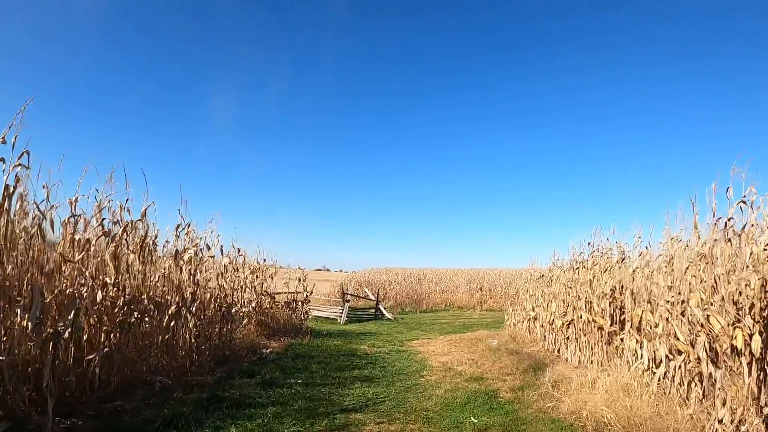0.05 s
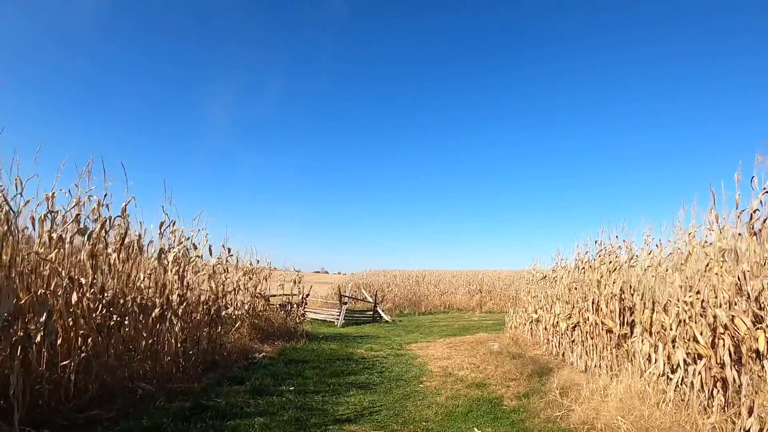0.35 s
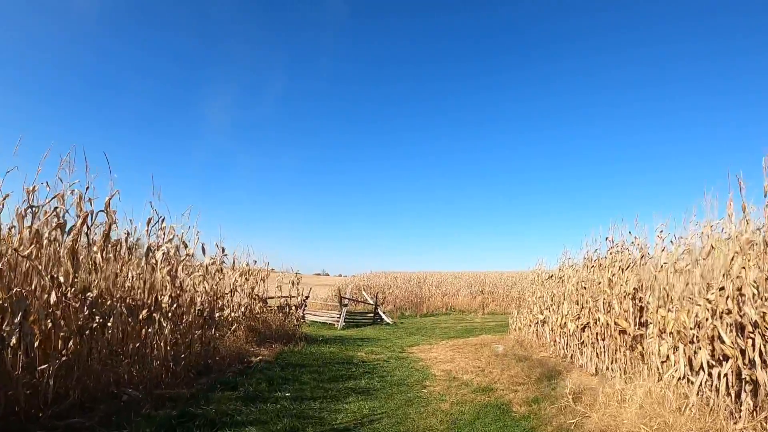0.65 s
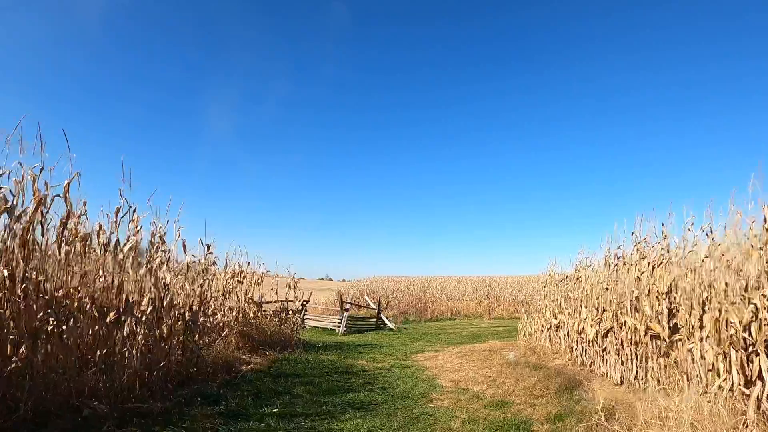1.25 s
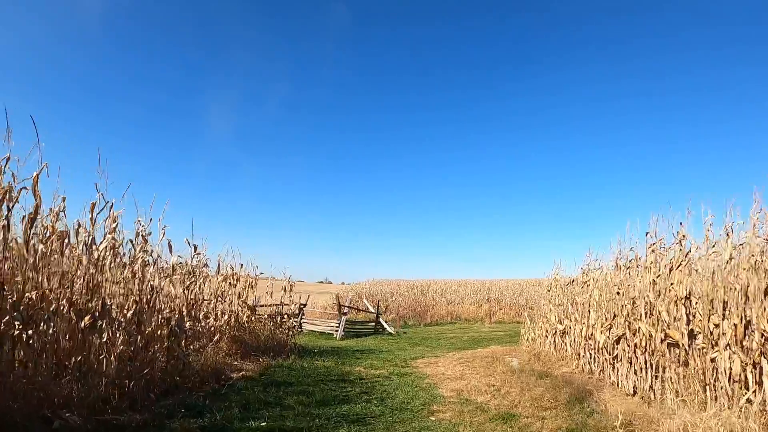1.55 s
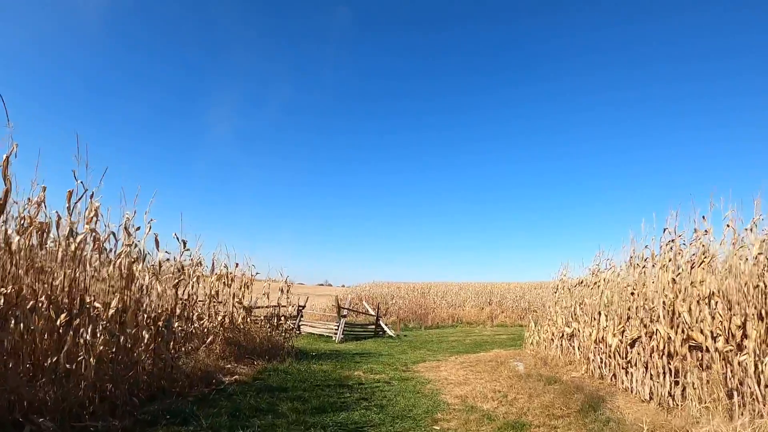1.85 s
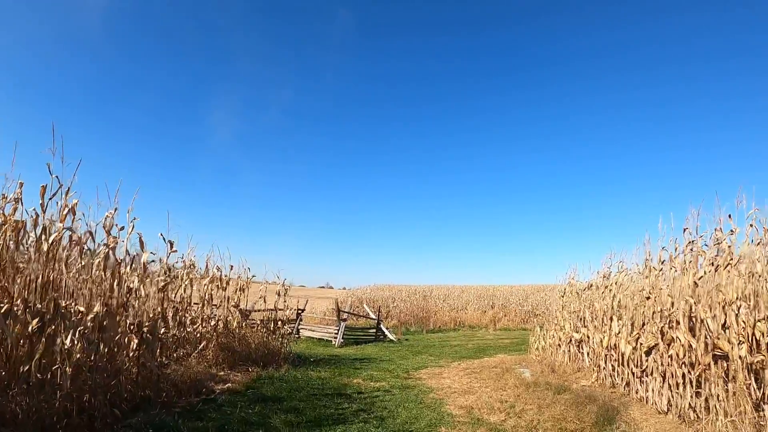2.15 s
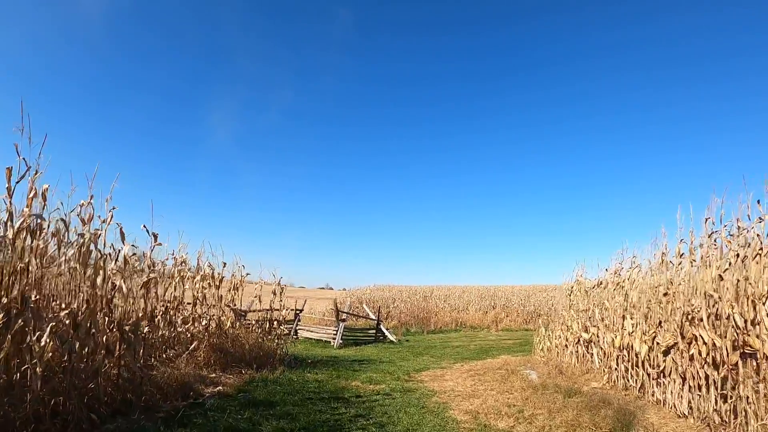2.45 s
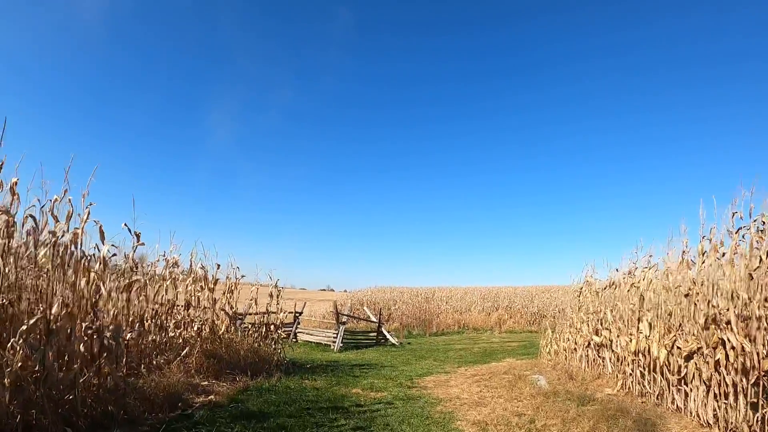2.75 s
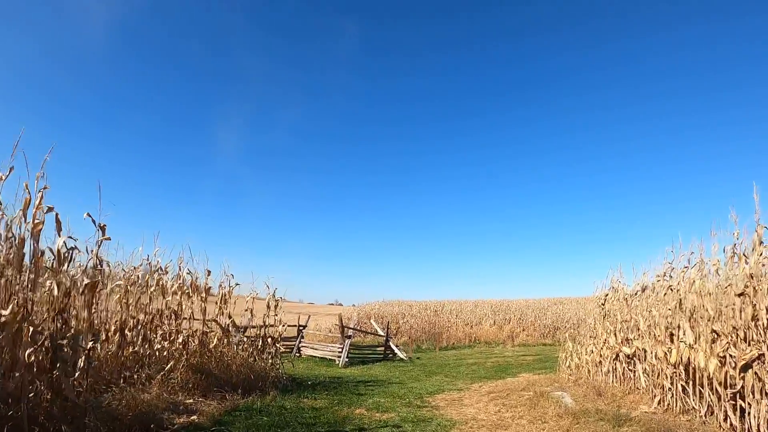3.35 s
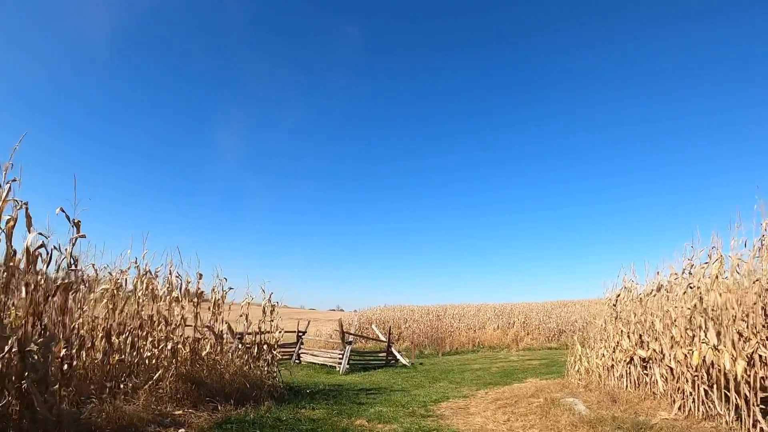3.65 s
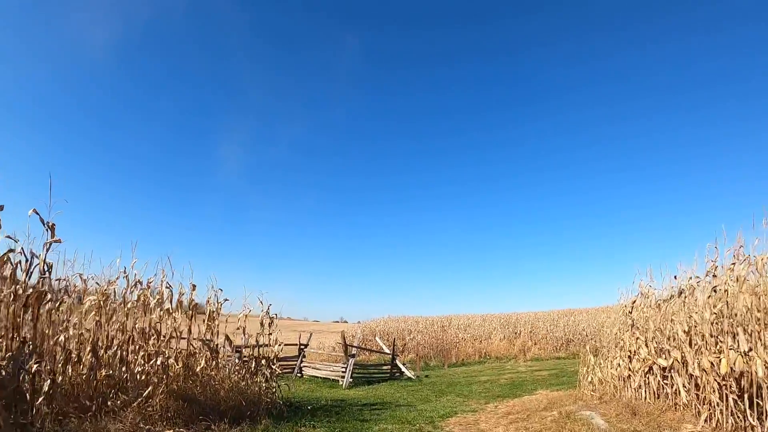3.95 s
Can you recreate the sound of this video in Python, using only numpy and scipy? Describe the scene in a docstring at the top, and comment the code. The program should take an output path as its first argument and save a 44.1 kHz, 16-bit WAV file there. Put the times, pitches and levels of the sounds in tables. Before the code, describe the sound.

Dry corn rustles in the wind outdoors. Leaves swish and stalks tick close on the left over a low microphone rumble and very faint insects. Near the end, a gust buffets the microphone with dull thumps.

```python
"""Dry corn hisses in the wind, over a low rumble of air on the microphone.
In the nearest row, on the left, leaves brush and scrape in runs of tiny slips and hollow stalks
tick as they knock together. Further off, insects trill and rasp faintly in the grass.
Near the end a gust buffets the microphone and single eddies thump against it."""
import sys
import numpy as np
from scipy import signal
from scipy.fft import rfft, irfft
from scipy.io import wavfile

SR = 44100
rng = np.random.default_rng(int(sys.argv[2]) if len(sys.argv) > 2 else 0)


def log_audio(samples):
    """Write samples as a 16-bit WAV file to the path given in sys.argv[1]."""
    # one column per channel
    frames = np.atleast_2d(samples).T
    # limit to full scale, then quantise
    limited = np.clip(frames, -1, 1)
    pcm = np.round(limited * 32767).astype(np.int16)
    wavfile.write(sys.argv[1], SR, pcm)


N = 176400
TIME = np.arange(N) / SR
HZ = np.maximum(np.arange(N // 2 + 1) * SR / N, 1)
NEAR_ROW_LEFT_DB, LEAF_FLUTTERS_PER_S = 9.5, 36


def from_db(db):
    """Decibels to gain."""
    return 10 ** (np.asarray(db) / 20)


def unit_rms(x):
    """Scale to unit power."""
    return x / np.sqrt(np.mean(x ** 2) + 1e-20)


def in_time(rows):
    """A control curve at every sample."""
    return np.interp(TIME, *np.transpose(rows))


def at_hz(points):
    """A spectrum table at every frequency."""
    hz, value = np.transpose(points)
    return np.interp(np.log(HZ), np.log(hz), value)


def band(x, low_hz, high_hz):
    """A causal band-pass."""
    return signal.sosfilt(signal.butter(2, [low_hz, high_hz], "band", fs=SR, output="sos"), x)


def swell(centre_s, length_s):
    """A smooth rise and fall around a moment."""
    return np.exp(-(2 * (TIME - centre_s) / length_s) ** 2)


def drift(per_s):
    """A smooth random wander of spread 1."""
    step, settle = 40, 2000  # samples per point, points discarded
    pole = np.exp(-2 * np.pi * per_s * step / SR)
    noise = rng.standard_normal(N // step + settle + 2)
    slow = signal.lfilter([1], [1, -2 * pole, pole * pole], noise)[settle:]
    return np.interp(np.arange(N) / step, np.arange(len(slow)), unit_rms(slow))


def pan(left_db):
    """Left and right gains for a level difference."""
    return unit_rms(from_db([[left_db / 2], [-left_db / 2]]))


def grains(per_s, spread_db, size=N):
    """Two streams of random clicks; with more spread, a few stand out."""
    sizes = from_db(spread_db * np.minimum(rng.exponential(1, (2, size)), 5))
    signs = rng.choice([-1, 1], (2, size))
    return unit_rms(sizes * signs * (rng.random((2, size)) < per_s / SR))


def friction(slips_per_s, spread_db, smooth, size=N):
    """Dry leaf on dry leaf: tiny slips within a hiss that holds the smooth share of the power."""
    slips = grains(slips_per_s, spread_db, size)
    return np.sqrt(1 - smooth) * slips + np.sqrt(smooth) * rng.standard_normal((2, size))


# balance of the microphone's two ports: (frequency [Hz], left over right [dB])
PORT_BALANCE = [(30, 1.8), (50, 6.5), (80, 4.2), (140, 1.1), (260, 1), (500, 2.9), (1200, 6), (2300, 7.5),
                (3500, 9.3), (5000, 1.8), (8000, 1.3), (12000, 3.7)]
# how alike the ports sound: (frequency [Hz], coherence [0-1])
PORT_COHERENCE = [(30, .55), (70, .45), (140, .85), (260, .93), (500, .73), (2000, .7), (4000, .5),
                  (8000, .33), (13000, .42)]
# phase between the ports: (frequency [Hz], left lead [rad])
PORT_LEAD = [(30, -3), (65, -1.8), (130, -1.5), (260, -1.5), (600, -.5), (1500, -.7), (2800, -1.1),
             (4600, .9), (6600, 1.3), (9000, 1.9), (13000, 2.6)]
def at_ports(pair, colour):
    """Colour two unrelated signals and blend them into the left and right ports."""
    shared, other = rfft(pair)
    alike, lean = np.clip(at_hz(PORT_COHERENCE), 0, 1), from_db(at_hz(PORT_BALANCE))
    right = alike * np.exp(-1j * at_hz(PORT_LEAD)) * shared + np.sqrt(1 - alike ** 2) * other
    ports = np.array([lean * shared, right]) * np.sqrt(2 / (1 + lean ** 2))
    return irfft(ports * unit_rms(from_db(at_hz(colour))), N)


def trill(first_s, per_s, hz, half_width_hz, jitter_s=.003, purity=.35):
    """Slightly uneven wing strokes sound a wavering tone; the corn scatters part of it."""
    strokes = np.cos(np.pi * per_s * (TIME - first_s + jitter_s * drift(7.1))) ** 4
    scattered = unit_rms(band(rng.standard_normal((2, N)), hz - half_width_hz, hz + half_width_hz))
    phase = 2 * np.pi * np.cumsum(hz + half_width_hz / 4 * drift(27.3)) / SR
    tone = unit_rms(np.sin([phase, phase + np.pi / 2]))
    uneven = from_db(2 * drift(30))
    return unit_rms(strokes * uneven * (np.sqrt(purity) * tone + np.sqrt(1 - purity) * scattered))


# insects off in the grass: (first pulse [s], pulse rate [1/s], pitch [Hz], half width [Hz],
# level before the swell [dB], left over right [dB])
TRILLERS = [(.038, 17.02, 7885, 130, -72, -2), (.01, 17.7, 8400, 130, -78, 1),
            (.03, 17.3, 7420, 260, -80, -2)]
# the trills swell and fade together: (time [s], gain [dB])
CHORUS_SWELL = [(0, -1.5), (1.1, -.5), (1.4, -3), (1.67, 3), (1.83, -5), (2.02, -4), (2.16, 3), (2.7, 0),
                (3.28, 3), (3.45, -3.5), (4, -2)]
# short strokes of a slower insect: (time [s], level [dB])
RASP_STROKES = [(.155, -72), (.375, -70), (.82, -70), (1.06, -68), (1.31, -70), (2.24, -67.5), (2.47, -65),
                (2.74, -66.5), (2.79, -69), (2.95, -71), (3.19, -71)]
def insects(teeth_per_s=120):
    """Three fast trills and one slow, toothed rasp, faint at the microphone."""
    trills = sum(from_db(db) * pan(left_db) * trill(s, per_s, hz, half_width)
                 for s, per_s, hz, half_width, db, left_db in TRILLERS)
    teeth = np.sin(np.pi * teeth_per_s * TIME) ** 2
    rasp = unit_rms(teeth * band(rng.standard_normal((2, N)), low_hz=8600, high_hz=9800))
    strokes = sum(from_db(db) * swell(s, length_s=.066) for s, db in RASP_STROKES)
    return from_db(in_time(CHORUS_SWELL)) * trills + rasp * strokes


# how hard the whole field stirs: (time [s], level [dB])
FIELD_STIR = [(0, -54.5), (.18, -58), (.33, -59), (.51, -59.5), (.8, -54.5), (1.2, -56.5), (1.6, -54),
              (2.2, -55), (2.8, -54.5), (3.2, -52.5), (3.6, -54), (4, -53)]
# its hiss from a distance: (frequency [Hz], relative density [dB])
FIELD_SPECTRUM = [(150, 11.5), (350, 4.5), (550, 0.5), (700, -2), (880, -1.5), (1100, 3.5), (1500, 3),
                  (2200, 2.5), (3500, 0), (5000, -2.5), (6300, -7), (7500, -3.5), (8700, -7.5),
                  (10000, -14), (11500, -20.5), (13000, -20.5), (15000, -39)]
def far_field(flutter_db=1.5):
    """Countless far leaves merge into a fluttering hiss, duller in the lulls."""
    stir_db = in_time(FIELD_STIR)
    slips = friction(slips_per_s=2500, spread_db=1.5, smooth=.8)
    # the papery treble grows faster than the rest
    treble = (from_db(stir_db - stir_db.mean()) - 1) * band(slips, low_hz=3000, high_hz=7050)
    level = from_db(stir_db + flutter_db * drift(LEAF_FLUTTERS_PER_S))
    return at_ports(level * (slips + treble), FIELD_SPECTRUM)


def husk_crackle(level_db=-66.5, t60_s=.018):
    """Husks and leaf tips scratch briefly along the near row, stronger as the field stirs."""
    out, decay = 0, np.exp(-np.log(1000) / (t60_s * SR))
    for hz in np.geomspace(1300, 4700, num=6):
        touches = np.abs(grains(per_s=31, spread_db=0)[0])
        scratches = signal.lfilter([1], [1, -decay], touches + 1e-18) * rng.standard_normal(N)
        out = out + unit_rms(band(scratches, hz / 1.09, hz * 1.25)) * pan(NEAR_ROW_LEFT_DB)
    stir_db = in_time(FIELD_STIR)
    return from_db(level_db + stir_db - stir_db.mean()) * unit_rms(out)


# scrapes close on the left: (peak time [s], length [s], pitch [Hz], level [dB])
EDGE_SCRAPES = [(0.259, 0.042, 1110, -55), (0.357, .13, 2500, -62), (0.621, 0.063, 1700, -56),
                (0.734, 0.11, 1250, -56), (0.85, 0.05, 2100, -58), (1.148, 0.017, 800, -57),
                (1.388, 0.069, 465, -64.5), (1.935, 0.067, 1350, -68), (2.932, 0.035, 3470, -51.5),
                (3.48, 0.046, 2900, -59), (3.709, 0.047, 3200, -48)]
def leaf_scrapes(width_octaves=.79):
    """A leaf edge drags over a stalk or husk, whose broad resonance colours the tiny slips."""
    out, half_band = 0, 2 ** (width_octaves / 2)
    for s, length, hz, db in EDGE_SCRAPES:
        slips = friction(slips_per_s=1100, spread_db=3.5, smooth=.22)[0]
        scrape = unit_rms(band(slips, hz / half_band, hz * half_band))
        out = out + from_db(db) * swell(s, length) * scrape
    return pan(NEAR_ROW_LEFT_DB) * out


# swishes in the nearest row: (start [s], rise [s], fall [s], level before tilt [dB], tilt [dB/octave])
LEAF_SWISHES = [(0.204, 0.0067, 0.21, -54.5, 0.5), (.27, 0.027, 0.49, -61, -2.5),
                (.565, 0.027, 0.2, -51, 1), (0.681, 0.053, 0.17, -62.5, 3), (.76, 0.062, 0.14, -57.5, -1),
                (.94, 0.046, 0.11, -56.5, 1.5), (1.3, 0.099, 0.044, -53.5, -1.5),
                (1.6, 0.18, 0.1, -55.5, 2.5), (1.821, 0.1, 0.24, -49.5, -1.5),
                (2.428, 0.048, 0.39, -57.5, 1.5), (2.878, 0.0073, 0.1, -49, 4),
                (3.04, 0.039, 0.23, -55.5, 1), (3.249, 0.075, 0.12, -56.5, 4.5),
                (3.38, 0.072, 0.11, -49.5, 1.5), (3.6, 0.03, 0.22, -52.5, 3.5), (3.77, 0.037, 0.23, -58, 3),
                (3.965, 0.011, 0.087, -53.5, 2)]
# dry leaves at close range: (frequency [Hz], relative density [dB])
LEAF_SPECTRUM = [(150, -9.5), (400, 13), (700, 4.5), (880, 7), (1150, 10.5), (2000, 8.5), (3500, 6),
                 (5000, 4), (6500, -1), (8500, -4.5), (10500, -11.5), (12500, -18), (15000, -28)]
def near_leaves(flutter_db=1, pivot_hz=2500):
    """Leaves brush past each other; each swish is dull or bright with the way the blades meet."""
    out, t = np.zeros((2, N + SR)), np.arange(SR // 2) / SR
    octaves = np.log2(np.clip(np.fft.rfftfreq(len(t), 1 / SR), 300, 6000) / pivot_hz)
    for s, rise, fall, db, tilt_db in LEAF_SWISHES:
        slips = friction(slips_per_s=2000, spread_db=2.5, smooth=.37, size=len(t))
        tilted = irfft(rfft(slips) * from_db(db + tilt_db * octaves), len(t))
        pressure = np.sin(np.pi / 2 * np.interp(t, [0, rise, rise + fall], [0, 1, 0])) ** 2
        start = int(s * SR)
        out[:, start:start + len(t)] += pressure * tilted
    flutter = from_db(flutter_db * drift(LEAF_FLUTTERS_PER_S))
    return at_ports(out[:, :N] * flutter, LEAF_SPECTRUM)


# stalks meet close on the left: (time [s], level [dB], pitch [Hz], t60 [s], snap over knock [dB])
STALK_KNOCKS = [(.155, -42, 1290, 0.019, -21), (.215, -38, 1310, 0.022, -8.5),
                (0.365, -40.5, 1170, .012, -11.5), (0.603, -48, 2500, 0.0038, 2),
                (.733, -41.5, 1410, 0.023, -20), (.801, -42, 2800, 0.012, -9),
                (0.961, -44, 4270, 0.0083, -9), (1.055, -45.5, 2180, 0.014, -15),
                (1.104, -45, 1380, 0.013, -2.5), (1.134, -43, 1250, 0.013, -13),
                (1.405, -45.5, 1360, 0.022, -19), (1.485, -43, 1470, 0.012, -8),
                (1.886, -40, 1240, 0.039, -16), (2.269, -41.5, 1090, 0.02, -5),
                (2.453, -46, 2900, 0.014, -20), (2.479, -41.5, 1090, 0.031, -9),
                (2.528, -44, 1200, 0.032, -5), (2.618, -37.5, 2030, 0.012, -11),
                (2.884, -45.5, 4340, .045, -2.5), (3.093, -35, 1240, 0.024, -14),
                (3.806, -48, 1900, 0.015, -1), (3.973, -45, 1900, 0.019, -5)]
def stalk_ticks(width_octaves=.3, crack_db=12):
    """A dying crunch sounds through a hollow stalk's broad resonance, with a dry snap."""
    out, t = np.zeros(N + SR), np.arange(SR // 10) / SR
    half_band = 2 ** (width_octaves / 2)
    crack = from_db(crack_db) * (t == 0)  # the first fibre to give way
    for s, db, hz, t60, snap_db in STALK_KNOCKS:
        crunch, fibres = rng.standard_normal((2, len(t)))
        knock = unit_rms(band(crunch, hz / half_band, hz * half_band))
        snap = unit_rms(band(fibres + crack, low_hz=484, high_hz=4730))
        envelope = from_db(db) * np.exp(-np.log(1000) * t / t60)
        start = int(s * SR)
        out[start:start + len(t)] += envelope * (knock + from_db(snap_db) * snap)
    return pan(NEAR_ROW_LEFT_DB) * band(out[:N], low_hz=300, high_hz=7500)


# deep rumble right on the microphone: (time [s], level before gain [dB])
RUMBLE_LEVEL = [(0, -42.5), (.3, -41), (.65, -44.5), (.9, -43), (1.03, -41), (1.15, -43.5), (1.45, -39.5),
                (1.6, -45), (1.83, -37), (2.05, -42), (2.6, -44), (2.97, -35), (3.13, -45.5), (3.38, -27),
                (3.5, -36.5), (3.75, -31), (3.89, -39), (4, -50.5)]
# its colour: (frequency [Hz], relative density [dB])
RUMBLE_SPECTRUM = [(15, -17), (28, 4), (48, -0.5), (65, -1.5), (85, -1.5), (120, -7), (160, -17.5),
                   (220, -44), (300, -55), (600, -100)]
# higher buffeting that swells in the gusts: (time [s], level before gain [dB])
BUFFET_LEVEL = [(0, -58.5), (.6, -55.5), (1.2, -59), (1.9, -58.5), (2.84, -57.5), (2.94, -44),
                (3.08, -59.5), (3.25, -59), (3.36, -43.5), (3.47, -48), (3.6, -40), (3.85, -45), (4, -55)]
# its colour: (frequency [Hz], relative density [dB])
BUFFET_SPECTRUM = [(60, -27), (110, -20), (160, 2.5), (205, -5), (250, -20.5), (310, -23), (400, -31),
                   (600, -49), (1500, -68)]
def microphone_wind(rumble_gain_db=9.5, buffet_gain_db=8.5, flutter_db=.76, rough_db=2):
    """Turbulence at the ports makes a deep, fluttering rumble with lumpy buffets above it."""
    flutter = unit_rms(from_db(flutter_db * drift(per_s=15)))
    rumble = flutter * at_ports(rng.standard_normal((2, N)), RUMBLE_SPECTRUM)
    lumps = unit_rms(from_db(rough_db * drift(per_s=22)))
    buffets = at_ports(lumps * rng.standard_normal((2, N)), BUFFET_SPECTRUM)
    return (from_db(rumble_gain_db + in_time(RUMBLE_LEVEL)) * rumble
            + from_db(buffet_gain_db + in_time(BUFFET_LEVEL)) * buffets)


# single eddies strike the microphone: (time [s], peak level [dB], pitch [Hz])
EDDY_STRIKES = [(2.903, -29, 89), (3.309, -22.5, 115), (3.355, -21.5, 167), (3.397, -16, 108),
                (3.405, -21, 146), (3.554, -17.5, 190), (3.58, -21, 155), (3.669, -18.5, 127.5),
                (3.711, -20.5, 148), (3.738, -19, 150), (3.789, -18.5, 142), (3.805, -27, 252)]
def eddies(width_octaves=.89, top_hz=283, lag_s=.0008):
    """Each eddy is one dull push of air, higher when it is small; it reaches the right port first."""
    out, half_band = 0, 2 ** (width_octaves / 2)
    dull = signal.butter(4, top_hz, fs=SR, output="sos")
    for s, db, hz in EDDY_STRIKES:
        push = (np.arange(N) == int(s * SR)) + 1e-18
        thump = signal.sosfilt(dull, band(push, hz / half_band, hz * half_band))
        out = out + from_db(db) * thump / np.abs(thump).max()
    delayed = np.interp(TIME - lag_s, TIME, out)
    return pan(left_db=2) * np.array([delayed, out])


def scene():
    """Wind, corn and insects from a microphone standing beside the nearest row."""
    air = microphone_wind() + eddies()
    corn = far_field() + near_leaves() + leaf_scrapes() + stalk_ticks() + husk_crackle()
    return air + corn + insects()


def record(dry, cutoff_hz=14800, fade_in_s=.003):
    """The sound fades in quickly and its top is cut steeply."""
    low_pass = signal.ellip(10, .1, 80, cutoff_hz, fs=SR, output="sos")
    return signal.sosfilt(low_pass, dry * np.minimum(TIME / fade_in_s, 1))


dry = scene()
out = record(dry)
log_audio(out)
```